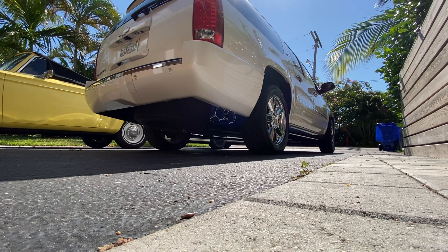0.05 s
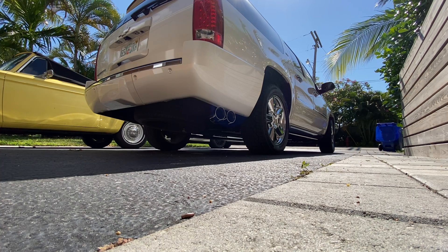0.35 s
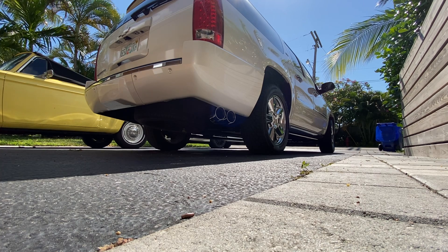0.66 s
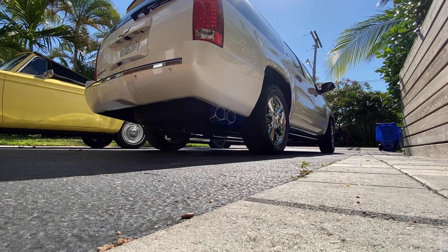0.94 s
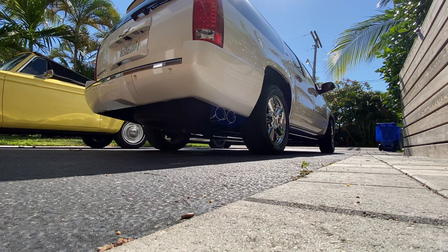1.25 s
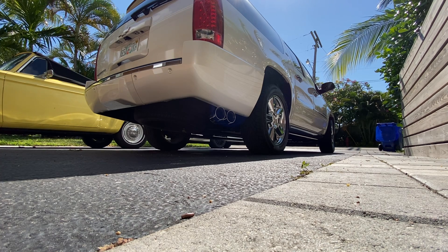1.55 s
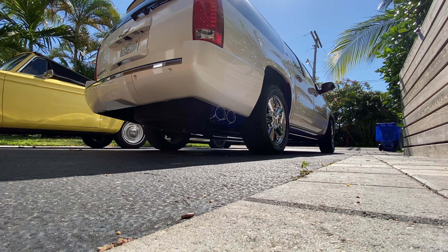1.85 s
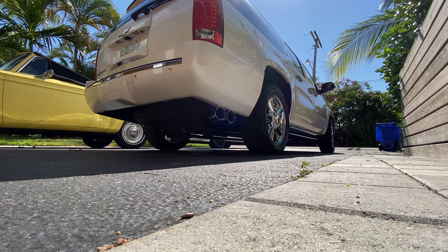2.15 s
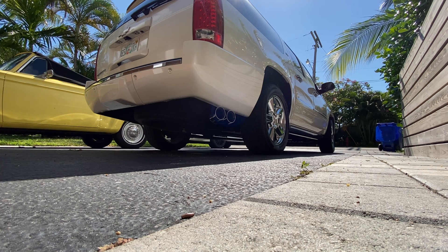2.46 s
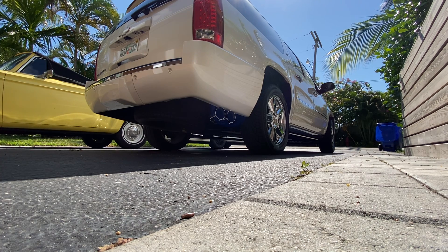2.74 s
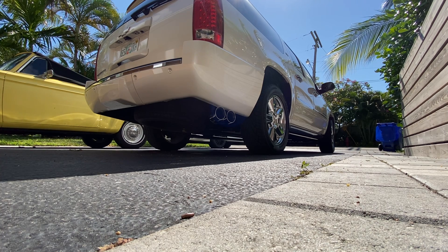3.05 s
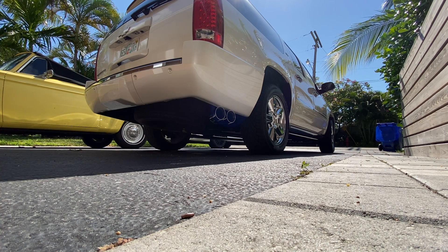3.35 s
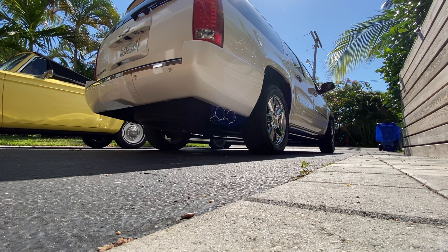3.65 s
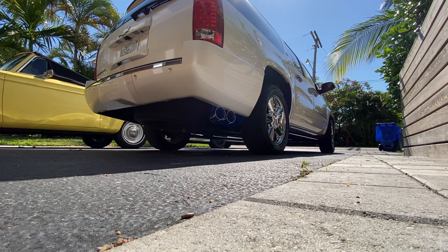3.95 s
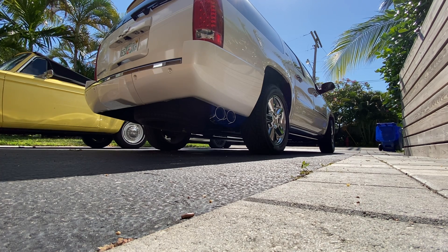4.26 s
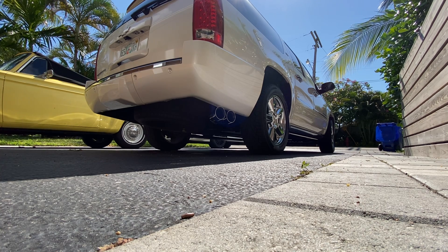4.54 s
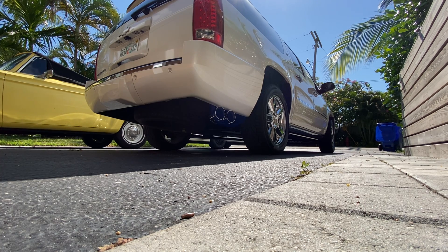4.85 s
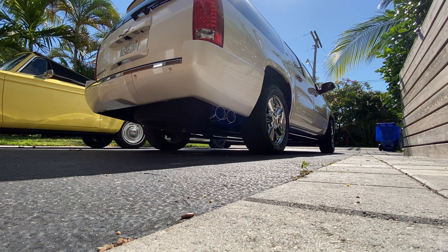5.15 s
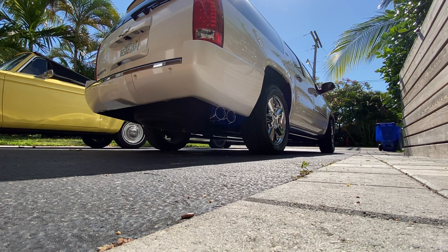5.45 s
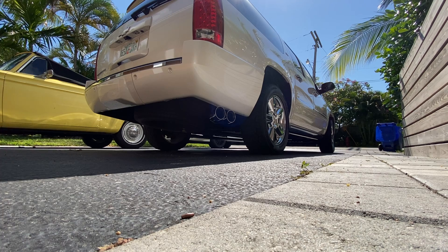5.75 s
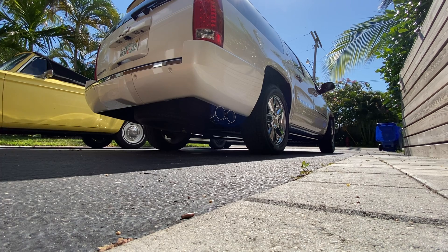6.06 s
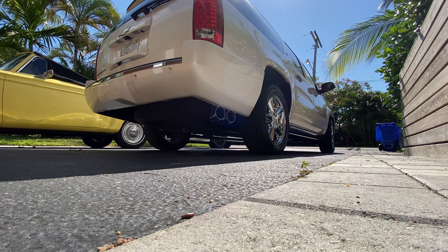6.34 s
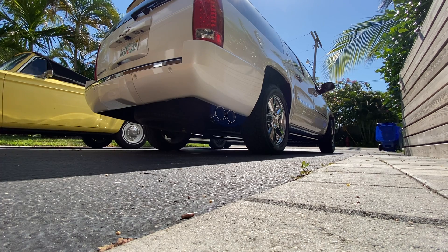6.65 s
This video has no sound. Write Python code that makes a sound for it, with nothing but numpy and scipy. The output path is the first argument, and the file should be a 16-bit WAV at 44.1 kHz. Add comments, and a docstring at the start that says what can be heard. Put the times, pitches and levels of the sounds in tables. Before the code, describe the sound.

A large V8 SUV idles on a driveway, heard from low down behind it, close to the tailpipe. The exhaust lopes with a deep, uneven throb and a light rasp, over faint engine hiss and ticking. About halfway through, the engine revs once, growling up to a smoother, higher note with a rush of air. Then the throttle shuts and it winds down with a low throb.

```python
"""A driveway; the microphone is a phone lying low behind a large V8 SUV, with a fence to the side.
It opens at idle: eight unequal firings per cycle lope through the exhaust, rasp at the tailpipe and puff
out gas, while the engine bay hisses and ticks and a thin sizzle fades within the first second.
From 3.5 s one rev growls up to 3400 rpm, the intake hisses and the firings merge into a clean note.
At 5 s the pedal lifts, a low throb comes in and the engine winds down."""
import sys
import numpy as np
from scipy import signal
from scipy.fft import rfft, irfft
from scipy.io import wavfile
from scipy.ndimage import uniform_filter1d

SR = 44100
rng = np.random.default_rng(int(sys.argv[2]) if len(sys.argv) > 2 else 0)


def digitize_waveform(pressure):
    """Quantize a signal to 16-bit integers and store it at the path in sys.argv[1].

    Rows of a 2-D input are taken as channels; values are limited to [-1, 1].
    """
    field = np.atleast_2d(pressure).T
    bounded = np.clip(field, -1, 1)
    quanta = np.round(bounded * 32767).astype(np.int16)
    wavfile.write(sys.argv[1], SR, quanta)


N = 295470
TIME = np.arange(N) / SR
FREQ = np.maximum(np.arange(N // 2 + 1) * SR / N, 1e-3)
SMOOTH_RPM, SMOOTH_RANGE_RPM = 2792, 155  # where the firings merge into a smooth stream

# crankshaft speed: time_s, speed_rpm
CRANK_SPEED = [(0.0, 1137.9), (0.48, 1142.8), (1.04, 1134.1), (1.48, 1139.1), (2.08, 1128.1),
               (3.28, 1122.6), (3.55, 1183.2), (3.68, 1243.3), (3.85, 1570.8), (4.01, 1992.5),
               (4.12, 2192.0), (4.25, 2504.0), (4.38, 2686.1), (4.57, 2885.0), (4.75, 3134.4),
               (4.93, 3341.4), (5.05, 3398.6), (5.38, 3102.5), (5.75, 2789.7), (6.18, 2410.9),
               (6.4, 2180.0), (6.7, 1846.3)]
# engine effort, 0.8 through the idle, higher in the two stabs of the pedal, negative with the
# throttle shut: time_s, load
ENGINE_LOAD = [(3.69, 0.8), (3.82, 1.46), (4.11, 0.77), (4.2, 1.23), (4.27, 0.84), (4.5, 0.54),
               (4.59, 0.57), (4.7, -0.2), (4.92, 0.3), (5.09, -1.54), (5.65, -0.5), (6.0, -1.06),
               (6.22, -0.49), (6.7, -1.2)]
# each cylinder's pulse at the tailpipe, in firing order:
# idle_db, idle_lag_ms, power_db, power_lag_ms, overrun_db, overrun_lag_ms
CYLINDER_PULSES = [(5.5, 2.15, 0.5, 1.15, -0.5, -0.6), (-1.5, 0.5, 2, 5.41, -7.5, 10.5),
                   (-6, 1.14, 9, 0.47, 4, 1.35), (6, 0.5, 5.5, 1.16, 6, 2.53),
                   (-0.5, 1, -2.5, 5.31, 8.5, 5.5), (5.5, 1.37, 6, 0.34, 7, 1.13),
                   (5.5, 0.5, 7, 5.87, 1.5, 7), (-13, -1, 4.5, 5.02, 7, 6.5)]
# how each layer follows the engine, ahead of its own fixed gain:
# base_db, pull_db_per_load, overrun_db_per_load, speed_db_per_1000_rpm, smooth_stream_db
BOOM_LEVEL = (-41, 6, 0, -3.5, -6.5)
DRONE_LEVEL = (-42, 7, -5.5, 1, -9)
BARK_LEVEL = (-46, 7, -6.5, 3.5, -2.5)
RASP_LEVEL = (-34, 6, -4.5, 1, -3)
RUSH_LEVEL = (-42.5, 10.5, 1, 1.5, 1.5)
BAY_LEVEL = (-46.5, 3.5, 0, 0, -0.5)
RUMBLE_LEVEL = (-62, 6, -9, -7, -18)

# exhaust system resonances: pitch_hz, width_hz, gain_db
EXHAUST_MODES = [(84.5, 49.8, 25), (102.46, 6.8, 8), (197.65, 44.2, 20), (254.2, 39.6, 10),
                 (321.94, 25.8, 21), (357.6, 21.4, 8.5), (417, 42.8, 13), (544.4, 53, 10.5)]
# the silencer rings more sharply with little gas flowing to damp it: pitch_hz, width_hz, added_db
SILENCER_COASTING = [(194, 5.8, 3.5), (329, 19, 3.5)]
# each cylinder's sharp pressure front, in firing order: level_db, lag_ms
CYLINDER_FRONTS = [(-7, 0), (0, 1.5), (3, -2), (-2, 0), (-10, -2), (5, 0.6), (6, 0), (-1, -3.5)]
# tailpipe resonances: pitch_hz, width_hz, gain_db
TAILPIPE_MODES = [(653, 41.6, 19.5), (743, 52, 9.5), (810, 22, 4), (879.3, 69, 19), (971, 52, 10.5),
                  (1148, 79, 15), (1320, 22, 7.5), (1449, 33, 15)]
# tailpipe resonances stirred by faster gas: pitch_hz, width_hz, added_db
TAILPIPE_FLOWING = [(620, 110, 3), (757, 44, 11.5), (986, 98, 4)]
# tailpipe ring lost with the throttle shut: pitch_hz, width_hz, added_db
TAILPIPE_COASTING = [(766, 60, -4.5), (946, 290, -6.5)]
# colour of the gas rush: pitch_hz, gain_db
RUSH_COLOUR = [(300, -62), (900, 0), (1400, -6.5), (2000, -13.5), (3000, -19), (5000, -26.5),
               (10000, -40.5), (16000, -43)]
# the engine bay hiss as picked up, with a treble notch from the ground and the phone: pitch_hz, gain_db
HISS_AT_MICROPHONE = [(500, 8.5), (2000, -7.5), (4000, -3), (5000, -4), (7000, -8), (8500, -11),
                      (11500, -12.5), (12400, -24), (13200, -47), (15000, -33), (16000, -42)]
# its peaks and hollows as picked up, with treble notches from the ground and the phone:
# pitch_hz, width_hz, gain_db
PICKUP_PEAKS_AND_NOTCHES = [(2110, 120, -1), (2400, 190, 3), (3180, 540, -37), (5100, 69, 9),
                            (5385, 236, -19), (5790, 200, 6.5), (6040, 136, -21), (6480, 340, 3),
                            (7610, 390, -26), (9370, 160, -18)]
# the hiss's direction at the microphone: pitch_hz, left_minus_right_db
BAY_DIRECTION = [(2000, -12.5), (3300, -1), (5000, 14.5), (7000, 0.5), (10000, -0.5)]
# each cylinder's valve tick, in firing order: relative_level_db
VALVE_TICKS = [19, -7, 16, 14, -6, 19.5, 12, 17.5]
# peaks of the engine bay's sizzle: pitch_hz, width_hz, gain_db
SIZZLE_MODES = [(4750, 240, 17), (5000, 110, 19)]
# the sizzle's swell and fade: time_s, level_db
SIZZLE_FADE = [(0, -57), (0.25, -48), (0.6, -52), (0.9, -72)]
# tailpipe to the two microphone ports, by ground and fence: pitch_hz, left_minus_right_db, left_lead_rad
MICROPHONE_PATHS = [(59.7, -2, 0), (157, -6, 0.57), (168, -15, 1.7), (279, 0, 1.32), (291, 2, 2),
                    (372.4, 12.5, -1.5), (496, -25, 0.4), (501.5, 4, -1), (537, -3.5, -3.5), (676, 3, -4.5),
                    (846, -3, -1), (990, -1.5, -6.5), (1477, 4, 1), (2630, -3, -0.66)]
# intake resonances: pitch_hz, width_hz, gain_db
INTAKE_MODES = [(1550, 690, 4), (2180, 600, 6), (3170, 680, 7), (3800, 240, 10)]
# the clean firing note at speed: zero_load_db, db_per_load
NOTE_LEVEL = (-17, 5.5)


def undb(db):
    """Decibels to gain."""
    return 10 ** (np.asarray(db) / 20)


def unit(x):
    """Scale to rms 1."""
    return x / np.sqrt(np.mean(x ** 2))


def over_time(table):
    """A time table's value at every sample."""
    return np.interp(TIME, *np.transpose(table))


def over_freq(table):
    """The columns of a frequency table, one value per bin."""
    hz, *columns = np.transpose(table)
    return [np.interp(np.log(FREQ), np.log(hz), column) for column in columns]


def shape(x, response):
    """Filter by a frequency response."""
    return irfft(rfft(x) * response, N)


def lowpass(hz):
    """Two-pole low-pass response."""
    s = 1j * FREQ / hz
    return 1 / (1 + np.sqrt(2) * s + s * s)


def highpass(hz):
    """Two-pole high-pass response."""
    return lowpass(hz) * (1j * FREQ / hz) ** 2


def resonances(table):
    """Response with a ringing peak or a hollow for each row of pitch_hz, width_hz, gain_db."""
    return undb(sum(db / (1 + 2j * (FREQ - hz) / width) for hz, width, db in table))


def pulses(times, sizes):
    """One click per firing, shared between neighbouring samples."""
    position = np.clip(times * SR, 0, N - 2)
    sample = position.astype(int)
    fraction = position - sample
    return np.bincount(sample, sizes * (1 - fraction), N) + np.bincount(sample + 1, sizes * fraction, N)


def puffs(clicks, decay_s):
    """Envelope that jumps at each click and dies away."""
    return unit(signal.lfilter([1], [1, -np.exp(-1 / (decay_s * SR))], clicks))


def stereo_noise(correlation):
    """Left and right noise, partly alike."""
    mid, side = rng.standard_normal((2, N))
    return np.sqrt(1 + correlation) * mid + np.sqrt(1 - correlation) * side * np.array([[1], [-1]])


def past(rpm, centre_rpm, range_rpm):
    """Rises from 0 to 1 as the speed passes through a range."""
    return np.clip((rpm - centre_rpm) / range_rpm + .5, 0, 1)


def coasting():
    """0 while the engine is fuelled, 1 once the throttle has shut."""
    return np.clip(-over_time(ENGINE_LOAD) / 0.6, 0, 1)


def layer_db(levels):
    """A layer's level from moment to moment, set by load and speed."""
    base_db, pull_db, overrun_db, speed_db, smooth_db = levels
    rpm, load = over_time(CRANK_SPEED), over_time(ENGINE_LOAD)
    effort_db = pull_db * np.maximum(load, 0) + overrun_db * np.maximum(-load, 0)
    smooth = past(rpm, SMOOTH_RPM, SMOOTH_RANGE_RPM)
    return base_db + effort_db + speed_db * (rpm - 1100) / 1000 + smooth_db * smooth


def crank_turns(rpm):
    """Turns of the crankshaft so far."""
    return np.cumsum(rpm) / SR / 60


def firings(rpm, start_phase=.174):
    """Times and cylinder numbers: eight firings in two turns of the crank."""
    fired = 4 * crank_turns(rpm)
    number = np.arange(int(fired[-1]))
    return np.interp(number + start_phase, fired, TIME), number % len(CYLINDER_PULSES)


def pressure_fronts(times, cylinder, rpm, lead_s=0.00395, scatter_db=0.5):
    """A sharp front runs ahead of each firing's thump; the train keeps its power at any speed."""
    level_db, lag_ms = np.array(CYLINDER_FRONTS)[cylinder].T
    sizes = undb(level_db + scatter_db * rng.standard_normal(len(times)))
    return pulses(times + lag_ms / 1000 - lead_s, sizes / np.sqrt(np.interp(times, TIME, rpm)))


def exhaust_pulses(times, cylinder, revving, idle_scatter_db=0.64, idle_jitter_ms=0.33):
    """Each cylinder's pulse arrives with its own strength and lag, which makes the lope."""
    idle_db, idle_ms, power_db, power_ms, coast_db, coast_ms = np.array(CYLINDER_PULSES)[cylinder].T
    shut, revved = np.interp(times, TIME, coasting()), np.interp(times, TIME, revving)
    revved_db = power_db + shut * (coast_db - power_db)
    revved_ms = power_ms + shut * (coast_ms - power_ms)
    jitter, scatter = rng.standard_normal((len(times), 2)).T * (1 - 0.7 * revved)
    strength_db = idle_db + revved * (revved_db - idle_db) + idle_scatter_db * scatter
    lag_ms = idle_ms + revved * (revved_ms - idle_ms) + idle_jitter_ms * jitter
    return pulses(times + lag_ms / 1000, undb(strength_db))


def exhaust(thumps, rpm, revving, split_hz=140, echo_s=0.01244, gain_db=50):
    """Pulses ring the pipes and silencer: a deep boom, a drone near 200 Hz and a bark above it."""
    # gas tears into turbulence behind each pulse, less so once the firings run evenly
    rush_db = layer_db(RUSH_LEVEL)
    roughness = 0.021 * undb(rush_db - np.median(rush_db)) * (1 - 0.55 * revving)
    turbulence = roughness * puffs(thumps, decay_s=0.0065) * rng.standard_normal(N)
    # the open end sends part of each pulse back along the pipe, inverted
    bounce = 1 - 0.38 * np.exp(-2j * np.pi * FREQ * echo_s)
    pipe = resonances(EXHAUST_MODES) * bounce * highpass(33.5) ** 2 * lowpass(860)
    boom = shape(thumps, pipe * lowpass(split_hz) ** 2)
    upper_path = pipe * silencer_chambers() * highpass(split_hz) ** 2 * lowpass(776) ** 2
    upper = shape(thumps + turbulence, upper_path)
    upper += coasting() * shape(upper, resonances(SILENCER_COASTING) - 1)
    upper = growl(upper, rpm)
    drone = shape(upper, 1 / (1 + (FREQ / 265) ** 10))
    bark = upper - drone
    bands = (boom, boom_db(rpm)), (drone, layer_db(DRONE_LEVEL)), (bark, layer_db(BARK_LEVEL))
    return sum(band * undb(level_db + gain_db) for band, level_db in bands)


def boom_db(rpm, balanced_db=-13.5, shut_db=-7.5):
    """The boom cancels as the two banks balance at speed under power; a shut throttle weakens it too."""
    balanced = past(rpm, centre_rpm=2530, range_rpm=352) * (1 - 0.86 * coasting())
    return layer_db(BOOM_LEVEL) + balanced_db * balanced + shut_db * coasting()


def silencer_chambers(width_hz=170):
    """All-pass response: each chamber holds its own pitch back, so a thump rolls out."""
    response = 1
    for hz, _, _ in EXHAUST_MODES[2::2]:
        detune = 2j * (FREQ - hz) / width_hz
        response = response * (1 - detune) / (1 + detune)
    return response


def tailpipe_rasp(fronts, revving, idle_snap=0.53, revved_snap=0.3, gain_db=3):
    """Each front and its puff of gas ring the tailpipe; at speed the gas takes over."""
    swell = puffs(puffs(fronts, decay_s=0.0012), decay_s=0.0044)
    gas = swell * rng.standard_normal(N)
    snap = idle_snap + revving * (revved_snap - idle_snap)
    source = (snap * unit(fronts) + gas) / np.sqrt(1 + snap ** 2)
    ring = unit(shape(source, resonances(TAILPIPE_MODES) * highpass(510) ** 2 * lowpass(880) ** 2))
    ring += revving * shape(ring, resonances(TAILPIPE_FLOWING) - 1)
    ring += coasting() * shape(ring, resonances(TAILPIPE_COASTING) - 1)
    return ring * undb(layer_db(RASP_LEVEL) + gain_db)


def gas_rush(fronts, load):
    """Gas streams out of the tailpipe; under load it breaks into one puff per firing."""
    depth = 0.18 + 0.68 * np.maximum(load, 0) ** 2
    stream = stereo_noise(correlation=0.012) * (1 + depth * puffs(fronts, decay_s=0.021)) / (1 + depth)
    return unit(shape(stream, undb(over_freq(RUSH_COLOUR)[0]))) * undb(layer_db(RUSH_LEVEL))


def engine_bay(fronts, gain_db=3):
    """Fan, belts and intake hiss and tick faintly at the far end; ground and phone notch the treble."""
    air = stereo_noise(correlation=0.28) * (1 + 0.059 * puffs(fronts, decay_s=0.0023))
    pan_db = over_freq(BAY_DIRECTION)[0] * np.array([[1], [-1]]) / 2
    picked_up = undb(over_freq(HISS_AT_MICROPHONE)[0] + pan_db) * resonances(PICKUP_PEAKS_AND_NOTCHES)
    return unit(shape(air, picked_up)) * undb(layer_db(BAY_LEVEL) + gain_db)


def valves(times, cylinder, revving, lag_s=.003, scatter_db=2, revved_db=-7, gain_db=-5):
    """The valve gear ticks after each firing and rings the engine's covers, standing out only at idle."""
    tick_db = np.array(VALVE_TICKS)[cylinder] + scatter_db * rng.standard_normal(len(times))
    ticks = pulses(times + lag_s, undb(tick_db))
    covers = resonances([(2011, 150, 37), (2525, 320, 31.4), (2970, 210, 19), (4850, 200, 21)])
    ring = unit(shape(ticks, covers * highpass(2440) ** 2 * lowpass(5100)))
    level_db = layer_db(BAY_LEVEL) + revved_db * revving + gain_db
    return (ring + driveway(ring, wet_db=-16.5)) * undb(level_db)


def sizzle(fronts):
    """A thin, bright sizzle from the engine bay flutters with the firings and fades early."""
    air = stereo_noise(correlation=0.27) * puffs(fronts, decay_s=0.019)
    colour = resonances(SIZZLE_MODES) * highpass(4500) ** 3 * lowpass(5200) ** 3
    return unit(shape(air, colour)) * undb(over_time(SIZZLE_FADE))


def buffeting():
    """The exhaust stirs the air near the ground, where the microphone lies, into a deep rumble."""
    rumble = shape(stereo_noise(correlation=0.7), highpass(14) * lowpass(50))
    return unit(rumble) * undb(layer_db(RUMBLE_LEVEL))


def microphone_ports(x):
    """Each pitch reaches the phone's two ports with its own level and delay."""
    balance_db, lead_rad = over_freq(MICROPHONE_PATHS)
    ratio = undb(balance_db)
    left_right = np.array([ratio * np.exp(1j * lead_rad), np.ones_like(ratio)])
    return shape(x, left_right * np.sqrt(2 / (1 + ratio ** 2)))


def driveway(x, t60_s=0.57, wet_db=-16):
    """Short scattered reflections come back from fence, cars and house."""
    tail = rng.standard_normal((2, N)) * np.exp(-np.log(1000) * TIME / t60_s) * (TIME > .008)
    tail /= np.sqrt(np.sum(tail ** 2, axis=1, keepdims=True))
    return shape(x, rfft(tail) * highpass(117)) * undb(wet_db)


def throttle_hiss(rpm, revving, base_db=-52, shut_db=3, db_per_1000_rpm=3):
    """Air rushes through the intake at speed, loudest past the shut throttle plate."""
    colour = resonances(INTAKE_MODES) * highpass(1300) ** 2 * lowpass(4200) ** 3
    air = unit(shape(stereo_noise(correlation=0.45), colour))
    level_db = base_db + shut_db * coasting() + db_per_1000_rpm * (rpm - 2980) / 1000
    return air * revving * undb(level_db)


def growl(x, rpm):
    """Under power the sound tends to repeat every three firings, which leaves throaty harmonics."""
    fired = 4 * crank_turns(rpm)
    neighbours = np.interp(fired - 3, fired, x) + np.interp(fired + 3, fired, x)
    share = 0.25 * past(rpm, centre_rpm=1450, range_rpm=500) * (1 - 0.79 * coasting())
    return (x + share * neighbours) / (1 + share)


def firing_note(rpm, load, lag_cycles=0.14):
    """Merged into a smooth stream, the firings sing one clean note, four beats to a turn of the crank."""
    zero_load_db, db_per_load = NOTE_LEVEL
    note = unit(np.sin(2 * np.pi * (4 * crank_turns(rpm) - lag_cycles)))
    return note * past(rpm, SMOOTH_RPM, SMOOTH_RANGE_RPM) * undb(zero_load_db + db_per_load * load)


def overrun_throb(rpm, source_db=-18.5, radiates_hz=52):
    """Coasting, the uneven banks pump three beats to two turns; the pipe radiates less as they slow."""
    tone = unit(np.sin(2 * np.pi * 1.5 * crank_turns(rpm)))
    swell = uniform_filter1d(coasting(), size=SR // 6) ** 2
    return shape(tone * swell * undb(source_db), np.abs(highpass(radiates_hz)) ** 4)


def scene():
    """From behind the car: tailpipe close, engine bay beyond it, all following one crankshaft."""
    rpm, load = over_time(CRANK_SPEED), over_time(ENGINE_LOAD)
    revving = past(rpm, centre_rpm=1425, range_rpm=550)  # 0 at idle, 1 once the engine has picked up
    times, cylinder = firings(rpm)
    fronts = pressure_fronts(times, cylinder, rpm)
    thumps = exhaust_pulses(times, cylinder, revving)
    tailpipe = exhaust(thumps, rpm, revving) + tailpipe_rasp(fronts, revving)
    tailpipe += firing_note(rpm, load) + overrun_throb(rpm)
    far_end = engine_bay(fronts) + valves(times, cylinder, revving)
    near_end = microphone_ports(tailpipe + gas_rush(fronts, load))
    reflections = driveway(tailpipe)
    far_end += sizzle(fronts) + throttle_hiss(rpm, revving)
    return near_end + reflections + far_end + buffeting()


def record(dry, ceiling=.95, top_hz=15700):
    """The phone rounds the very highest peaks and cuts the top of the treble."""
    rounded = dry / (1 + (dry / ceiling) ** 8) ** (1 / 8)
    return signal.sosfilt(signal.ellip(8, .2, 70, top_hz, fs=SR, output="sos"), rounded)


dry = scene()
out = record(dry)
digitize_waveform(out)
```